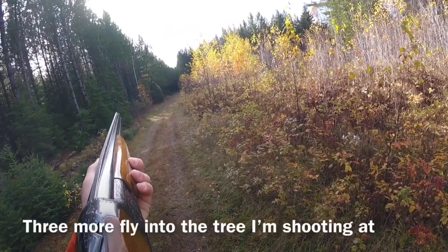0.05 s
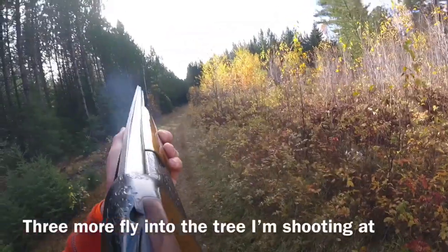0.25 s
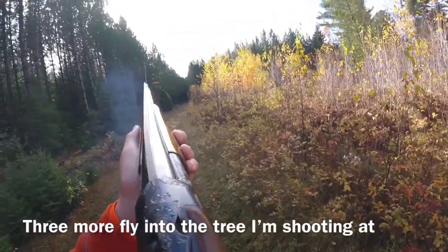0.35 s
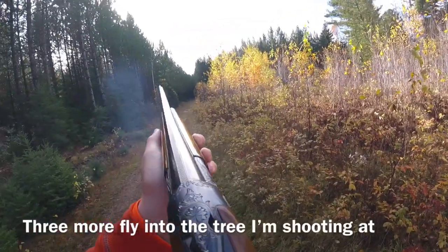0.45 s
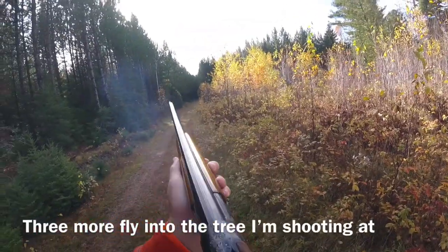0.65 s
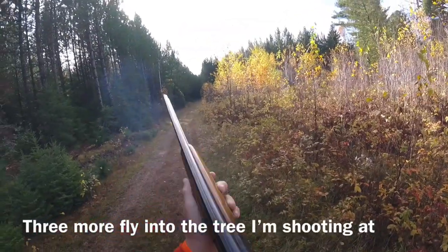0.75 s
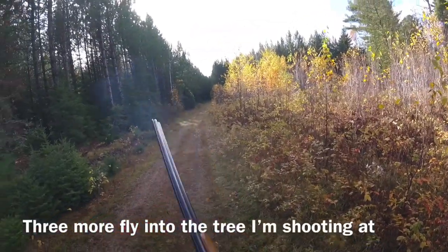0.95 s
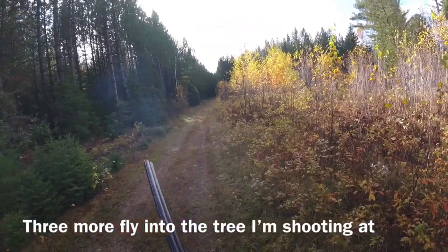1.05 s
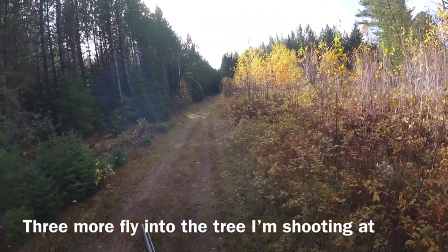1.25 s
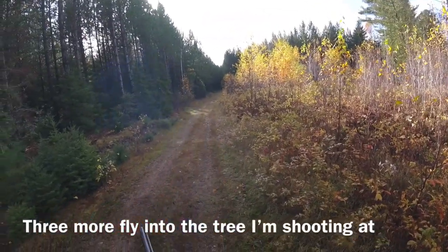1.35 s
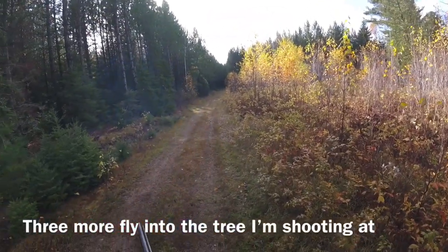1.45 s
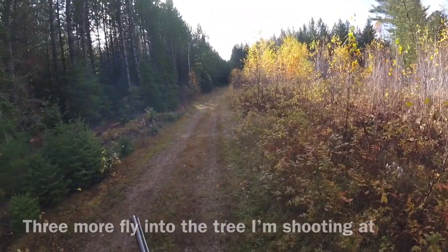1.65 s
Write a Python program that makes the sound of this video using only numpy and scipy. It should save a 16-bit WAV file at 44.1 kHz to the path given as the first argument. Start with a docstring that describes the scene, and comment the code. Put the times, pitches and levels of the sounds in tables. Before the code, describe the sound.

One loud, sharp shotgun blast goes off close by at about 0.25 seconds, after a moment of faint hiss and wind. A brief bright rustle of brush trails it, and a few distinct echoes return by 0.75 seconds. A softer rolling forest echo swells until about 0.8 seconds, then dulls and fades through 1.7 seconds, with faint high ticks in the trees.

```python
"""A forest trail: one shotgun blast, heard from a small camera worn by the shooter.
Faint hiss, hum and wind dip just before the shot. Shock fronts from the muzzle set the camera's case
ringing and reflect off the ground, among bright rattles and rustling brush. Thousands of trunks
scatter the shot back as a long roll that swells, grows duller by air absorption and fades,
with a few distinct echoes from tree lines and faint ticks in the trees."""
import sys
import numpy as np
from scipy import signal
from scipy.fft import rfft, irfft
from scipy.io import wavfile
from scipy.ndimage import uniform_filter1d

SR = 44100
rng = np.random.default_rng(int(sys.argv[2]) if len(sys.argv) > 2 else 0)


def wav_out(sig):
    """Save sig, one row per channel (or a flat mono array), as 16-bit PCM at SR to the path in sys.argv[1]."""
    wavfile.write(sys.argv[1], SR, np.round(np.clip(np.atleast_2d(sig).T, -1, 1) * 32767).astype(np.int16))


N = 74970

# Spectra. Each row: frequency in Hz, relative level in dB.
HISS_SPECTRUM = [(100, -1), (250, -9.5), (650, -10), (900, -14), (2000, -19), (3300, -22.5), (4200, -35),
                 (5500, -23), (6150, -21.5), (6500, -11.5), (7200, -18), (9500, -24), (10500, -31.5),
                 (12000, -27.5), (13500, -31.5), (14200, -58)]
WIND_SPECTRUM = [(10, -1), (35, 4), (65, -3), (100, -13), (200, -30), (600, -61.5)]
RATTLE_SPECTRUM = [(100, -10), (500, -7), (1500, -10), (4000, -11), (5400, 4), (6800, -8), (9700, -15.5),
                   (10800, -40), (14000, -57)]  # shared by rattles, brush and leaves
MICROPHONE_RESPONSE = [(60, -3.5), (170, -1.5), (350, -3), (700, 0.5), (1500, -0.5), (2300, 3.5),
                       (2800, -6), (3500, -5), (4150, -10.5), (5400, -2), (8000, 2.5), (10300, -15.5),
                       (12400, -15.5), (14000, -35)]  # to the shock fronts
CRACK_SPECTRUM = [(300, -26.5), (1500, -16.5), (2200, -27), (2800, -22), (3500, -18.5), (4100, -23.5),
                  (4650, -11.5), (4900, -6), (5370, 5), (5900, -7.5), (6400, 6.5), (6900, -6), (7300, 2.5),
                  (8100, -0.5), (8500, -9.5), (9050, -8), (10400, -20.5), (12400, -20), (14000, -25)]
NEAR_TREE_SPECTRUM = [(40, -26), (100, -12), (155, -7), (230, -9), (330, -4.5), (450, -6), (600, -3.5),
                      (780, 4.5), (1050, -6.5), (1600, -6.5), (2500, -12.5), (3300, -12.5), (4100, -17.5),
                      (5500, -6.5), (7000, -23), (9400, -25), (11000, -49.5)]  # before air absorption
FAR_FOREST_SPECTRUM = [(40, -23.5), (100, -24), (170, -19), (240, -13), (350, -3.5), (520, -2), (740, 1),
                       (1050, -4.5), (1600, -7.5), (2500, -11.5), (3300, -15), (4100, -19.5), (4800, -11),
                       (5500, -2.5), (6200, -13.5), (7000, -20), (9400, -28.5), (11000, -51.5)]  # before air absorption
TREE_LINE_SPECTRUM = [(40, -48), (130, -23), (300, -7.5), (720, 2.5), (1100, -0.5), (1800, -10),
                      (4000, -23.5), (5500, -19), (7000, -33), (11000, -68)]
TWIG_SPECTRUM = [(1000, -41), (4400, -17.5), (5400, 5), (5900, -8.5), (6800, -24), (11000, -53)]

# Envelopes. Each row: time in seconds, gain in dB.
WIND_ENVELOPE = [(0, -49), (0.11, -54), (0.16, -50), (0.3, -49), (0.9, -55), (0.98, -41), (1.06, -55),
                 (1.12, -45), (1.2, -48), (1.42, -56), (1.52, -54.5), (1.7, -56.5)]  # before the dip
BACKGROUND_DIP = [(0, 0.5), (0.175, 0.5), (0.18, -17), (0.207, -17), (0.213, -47), (0.3, -8), (0.7, -27.5),
                  (1.0, -9), (1.7, -4.5)]
ROLL_ENVELOPE = [(0.25, -52.5), (0.305, -46), (0.34, -41), (0.39, -38.5), (0.45, -35), (0.535, -34),
                 (0.572, -37.5), (0.61, -30.5), (0.645, -33), (0.69, -31), (0.755, -28), (0.79, -31),
                 (0.88, -30), (1.02, -30.5), (1.15, -31), (1.27, -33), (1.38, -33.5), (1.7, -36)]  # the forest's echo before its losses along the path

# Shock arrivals. Each row: start in seconds, relative level in dB, length of the overpressure
# in milliseconds, relative level of the case's ringing in dB.
MUZZLE_SHOCKS = [(0.2413, 3, .22, -4.5), (0.24182, -1.5, .12, -8), (0.2427, -1, .3, -0.5)]  # the blast and its reflections off gun and shooter
GROUND_SHOCKS = [(0.249, -9.5, .7, -20)]
# Modes of the camera's case. Each row: frequency in Hz, relative level in dB, seconds to fall 60 dB.
CASE_MODES = [(675.1, -24, .009), (2200, -22, 0.0041), (5380, 0.5, 0.0036), (5460, -20.5, .007),
              (5934, -14.5, .006), (7760, -9.5, 0.0024), (8230, -3.5, .004), (9030, -24.5, .004)]

# Noise bursts. Each row: start in seconds, level in dB, decay time constant in seconds.
RATTLE_BURSTS = [(0.2364, -37.5, .002), (0.2405, -17, 0.0017), (0.2456, -17.5, 0.00044),
                 (0.2497, -21, 0.0026), (0.402, -35.5, 0.0077)]  # hammer, gun and nearby brush
TREE_LINE_ECHOES = [(0.306, -34.5, 0.00136), (0.3245, -31.5, 0.0013), (0.336, -33, 0.0043),
                    (0.363, -32, 0.0017), (0.4488, -32, .003), (0.6597, -25, .003), (0.744, -30, 0.0044)]
TWIG_TICKS = [(0.52, -42.5, 0.017), (0.825, -40.5, .005), (0.869, -50.5, .004), (0.94, -51, .004),
              (0.972, -51, .004), (0.984, -50, .004), (1.057, -50, .004), (1.458, -67.5, 0.0044),
              (1.515, -64.5, 0.0058), (1.634, -63.5, 0.009)]

SHOT_S, GROUND_S = MUZZLE_SHOCKS[0][0], GROUND_SHOCKS[0][0]


def undb(db):
    """Amplitude grows tenfold for every 20 dB."""
    return 10 ** (np.asarray(db) / 20)


def unit(x):
    """Normalisation to an rms of 1."""
    return x / np.sqrt(np.mean(x ** 2) + 1e-20)


def clock():
    """Uniform sampling: the time of each sample in seconds."""
    return np.arange(N) / SR


def envelope(points):
    """Gain interpolated in decibels between (seconds, dB) points."""
    return undb(np.interp(clock(), *np.array(points).T))


def tint(x, spectrum):
    """Minimum-phase filtering through (Hz, dB) points, preserving the power of white noise."""
    hz, db = np.array(spectrum, float).T
    bin_hz = np.maximum(np.arange(N + 1) * SR / (2 * N), 1)
    gain = unit(undb(np.interp(np.log(bin_hz), np.log(hz), db)))
    cepstrum = irfft(np.log(gain))
    cepstrum[1:N] *= 2  # folding onto positive time makes the filter causal
    cepstrum[N + 1:] = 0
    return irfft(rfft(x, 2 * N) * np.exp(rfft(cepstrum)))[:N]


def burst(start, decay_s, hold_s=0):
    """Noise that starts at once, holds and decays exponentially."""
    age = clock() - start
    return rng.standard_normal(N) * (age >= 0) * np.exp(-np.maximum(age - hold_s, 0) / decay_s)


def bursts(rows):
    """Superposition of independent noise bursts, one a row."""
    return sum(undb(db) * burst(start, decay_s) for start, db, decay_s in rows)


def wander(per_s):
    """Slow random modulation: steps smoothed by a moving average, with an rms of 1."""
    step = max(int(SR / per_s), 1)
    steps = np.repeat(rng.standard_normal(N // step + 1), step)
    return unit(uniform_filter1d(steps, step)[:N])


def blast_wave(start, push_s):
    """A sudden overpressure relaxes into a weaker rarefaction."""
    age = np.maximum(clock() - start, 0) / push_s
    return (age > 0) * (1 - age) * np.exp(-age)


def background():
    """Turbulence rumbles on the microphone beside hiss and a pure hum; all dip around the shot."""
    hiss = undb(-59.5) * tint(rng.standard_normal(N), HISS_SPECTRUM)
    wind = envelope(WIND_ENVELOPE) * tint(rng.standard_normal(N), WIND_SPECTRUM)
    hum = undb(-68) * np.sqrt(2) * np.sin(2 * np.pi * 694 * clock())
    return (hiss + wind + hum) * envelope(BACKGROUND_DIP)


def soft_tick(start=.1757):
    """A weak pressure pulse with a noisy edge is heard as a tick where the dip begins."""
    return undb(-38) * blast_wave(start, push_s=.005) + undb(-54.5) * burst(start, decay_s=.00045)


def rattles():
    """Brief impacts of hammer, gun and brush radiate bright, broadband noise."""
    return tint(bursts(RATTLE_BURSTS), RATTLE_SPECTRUM)


def shock_fronts():
    """The blast wave arrives directly, then by reflection off gun, shooter and ground."""
    arrivals = MUZZLE_SHOCKS + GROUND_SHOCKS
    pressure = sum(undb(db) * blast_wave(start, ms / 1000) for start, db, ms, _ in arrivals)
    return undb(-4) * tint(pressure, MICROPHONE_RESPONSE)


def case_ring():
    """Each shock front excites the modes of the camera's case, which ring as damped sinusoids."""
    ring = 0
    for start, _, _, strike_db in MUZZLE_SHOCKS + GROUND_SHOCKS:
        age = np.maximum(clock() - start, 0)
        for hz, mode_db, t60 in CASE_MODES:
            decay_db = 60 * np.minimum(age / t60, 3)
            ring += undb(strike_db + mode_db - decay_db) * np.sin(2 * np.pi * hz * age)
    return undb(-2.5) * ring


def muzzle_gas():
    """Expanding gas gives a sharp crack of noise and a slow, low-frequency push."""
    crack = tint(burst(SHOT_S, decay_s=.0004, hold_s=.0013), CRACK_SPECTRUM)
    low_pass = signal.butter(2, 130, fs=SR, output="sos")
    puff = signal.sosfilt(low_pass, blast_wave(SHOT_S, push_s=.007))
    return undb(-10.5) * crack + undb(-29.5) * puff


def undergrowth():
    """Small obstacles scatter short wavelengths: brush and dry leaves return the treble."""
    brush = undb(-30) * burst(GROUND_S, decay_s=.012)
    leaves = undb(-47.5 + 1.5 * wander(per_s=60)) * burst(GROUND_S, decay_s=.13, hold_s=.28)
    return tint(brush + leaves, RATTLE_SPECTRUM)


def air_absorption(echoes, age):
    """Loss in dB grows with travel time, most in the treble; each half-octave band also flickers."""
    spectrum = rfft(echoes, 2 * N)
    centres_hz = 40 * 2 ** np.arange(0, 9, .5)
    log_hz = np.log(np.maximum(np.arange(N + 1) * SR / (2 * N), 1))
    shimmer_db = 1.5 * wander(per_s=90)  # common to all bands, strongest in the treble
    out = 0
    for hz, selector in zip(centres_hz, np.eye(len(centres_hz))):
        band = irfft(spectrum * np.interp(log_hz, np.log(centres_hz), selector))[:N]
        air_db_per_s = 4.5 * (hz / 1000) ** 1.25
        bass_db_per_s = 2 / (1 + (hz / 147.35) ** 2)  # the bass fades a little too
        flicker_db = .94 * wander(per_s=25) + shimmer_db * min(hz / 4000, 1)
        out += band * undb(flicker_db - (air_db_per_s + bass_db_per_s) * age)
    return out


def forest_roll():
    """Scattering off trunks: the spreading front meets ever more of them, so the echoes grow denser."""
    t = clock()
    age = np.maximum(t - GROUND_S, 0)
    echoes_per_s = 5000 * (age + .088)
    chance = echoes_per_s / SR
    polarity = rng.choice([-1, 1], N)
    spread_db = np.clip(rng.standard_normal(N), -2, 2)
    arrives = (rng.random(N) < chance) * (age > 0)
    impulses = arrives * unit(polarity * undb(spread_db)) / np.sqrt(chance)  # even power at any density
    echoes = impulses * envelope(ROLL_ENVELOPE)
    far_share = .5 + .5 * np.tanh((t - .6) / .098)  # near trees give way to far forest
    near = tint(echoes * (1 - far_share), NEAR_TREE_SPECTRUM)
    far = tint(echoes * far_share, FAR_FOREST_SPECTRUM)
    return air_absorption(near + far, age)


def tree_lines():
    """Reflection from rows of trees returns distinct echoes, each smeared into a short burst."""
    return tint(bursts(TREE_LINE_ECHOES), TREE_LINE_SPECTRUM)


def twigs():
    """Small impacts, likely pellets and bits of twig in the trees, radiate faint high ticks."""
    return tint(bursts(TWIG_TICKS), TWIG_SPECTRUM)


def scene():
    """Superposition: the quiet trail, the shot and its echoes add in one channel."""
    shot = rattles() + shock_fronts() + case_ring() + muzzle_gas()
    aftermath = undergrowth() + forest_roll() + tree_lines() + twigs()
    return (background() + soft_tick() + shot + aftermath)[None]


def record(dry):
    """Saturation in the camera rounds the loudest peaks, and a low-pass filter limits the bandwidth."""
    ceiling, cutoff_hz = .92, 14000
    low_pass = signal.ellip(8, .2, 70, cutoff_hz, fs=SR, output="sos")
    return signal.sosfilt(low_pass, ceiling * np.tanh(dry / ceiling))


dry = scene()
out = record(dry)
wav_out(out)
```